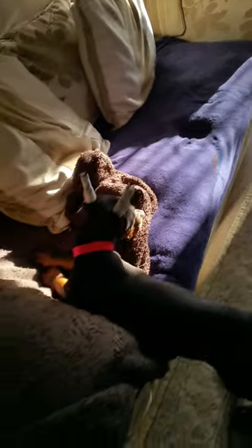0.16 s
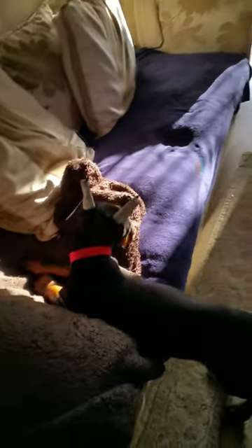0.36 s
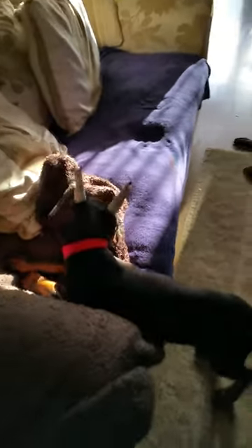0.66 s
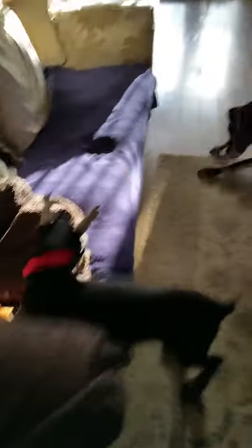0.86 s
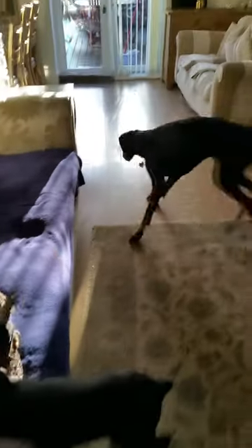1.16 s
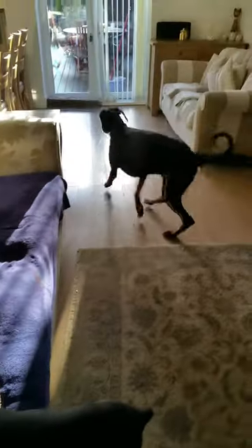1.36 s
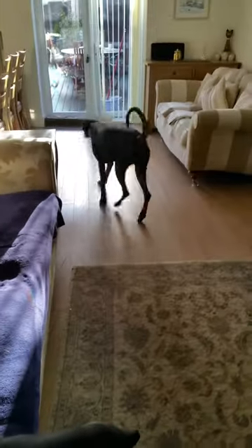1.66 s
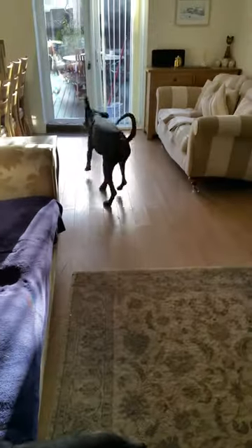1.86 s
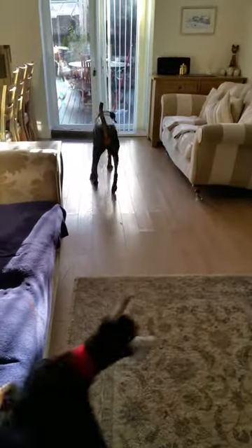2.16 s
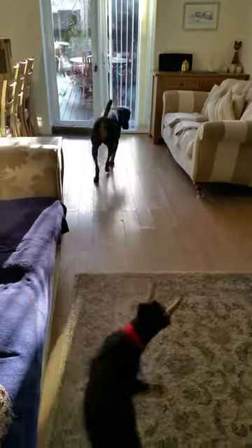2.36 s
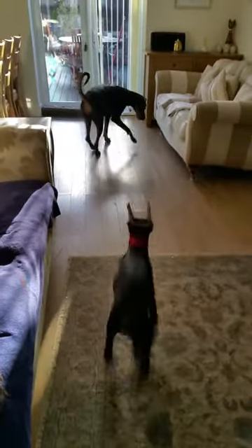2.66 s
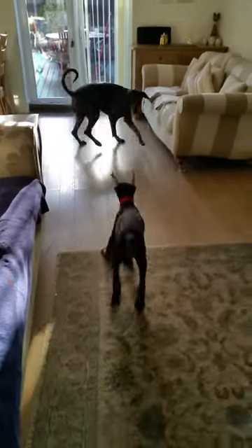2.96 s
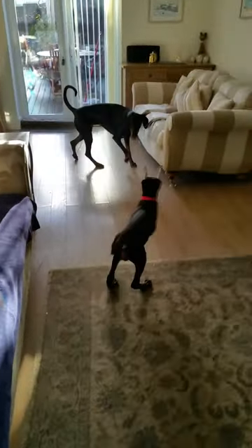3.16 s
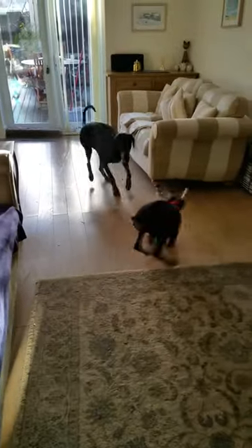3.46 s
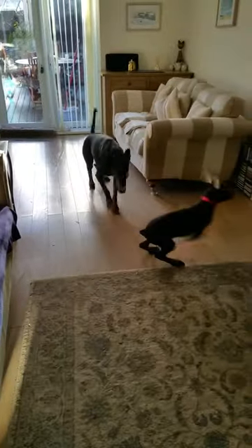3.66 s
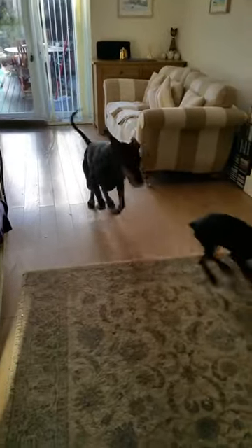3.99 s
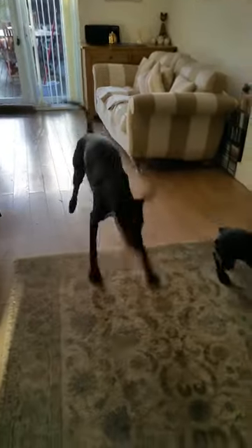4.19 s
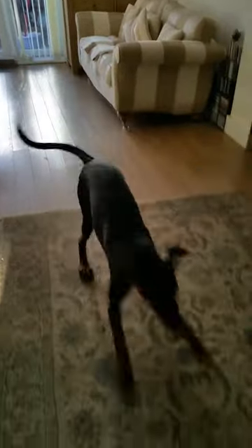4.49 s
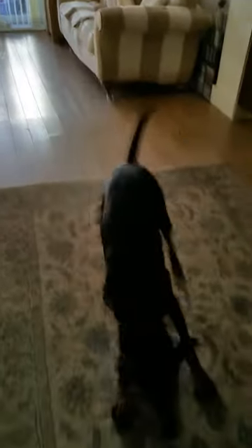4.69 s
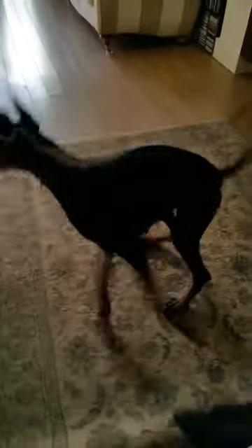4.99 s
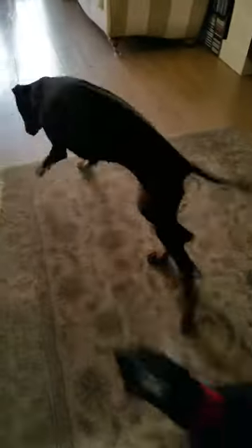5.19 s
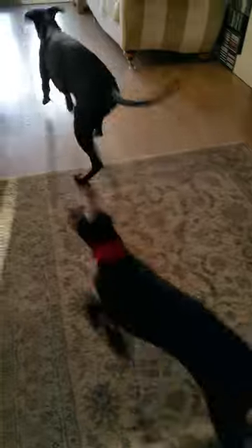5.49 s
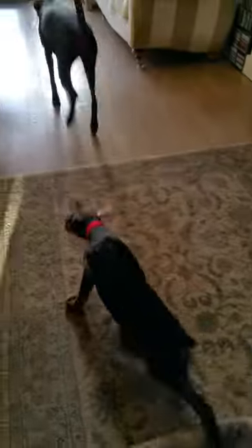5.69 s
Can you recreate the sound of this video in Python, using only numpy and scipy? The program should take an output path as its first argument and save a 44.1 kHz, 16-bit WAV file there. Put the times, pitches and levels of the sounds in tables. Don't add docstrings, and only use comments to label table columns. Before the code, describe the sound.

Two dogs play on laminate and rug near a phone. Low hollow paw thuds, dry nail clicks, scratchy scrapes and rubbing pads come in bursts separated by near-quiet gaps. Metal tags tinkle once clearly, later only faintly. The second half is busier and louder, with one piercing crack. A moderately furnished room adds a short diffuse tail over very faint hum.

```python
import sys
import numpy as np
from scipy import signal
from scipy.fft import rfft, irfft, next_fast_len
from scipy.io import wavfile
from scipy.ndimage import uniform_filter1d, map_coordinates

SR = 44100
rng = np.random.default_rng(int(sys.argv[2]) if len(sys.argv) > 2 else 0)


def to_linear_factor(level_db):
    exponent = np.asarray(level_db, float) / 20
    return 10 ** exponent


def dump(signal):
    limited = np.clip(np.atleast_2d(signal).T, -1, 1)
    pcm = np.round(limited * 32767).astype(np.int16)
    wavfile.write(sys.argv[1], SR, pcm)


N = 257532
TAILS = 5


def unit(x):
    return x / np.sqrt(np.mean(x ** 2) + 1e-20)


def along(points, hz):
    f, v = np.transpose(points)
    return np.interp(np.log(hz + 1), np.log(f + 1), v)


def filtered(x, response):
    m = next_fast_len(x.shape[-1] + 4096)
    return irfft(rfft(x, m) * response(np.fft.rfftfreq(m, 1 / SR)), m)[..., :x.shape[-1]]


def lumps(count, size):
    return unit(uniform_filter1d(rng.standard_normal(count), size, axis=-1))


# hz, likeness (1 = equal, 0 = unrelated)
LIKENESS = [(60, 0.89), (150, 1), (380, 0.75), (950, 0.15), (2380, -1.2), (5980, 0.16), (15000, -1.3)]


def spread(pair, spectrum):
    def turn(hz):
        return np.arccos(np.clip(along(LIKENESS, hz), 0, 1)) / 2

    def response(hz):
        return to_linear_factor(along(spectrum, hz)) * [np.cos(turn(hz)), np.sin(turn(hz))]

    mid, side = filtered(pair, response)
    return np.array([mid + side, mid - side])


def rush(spectrum, grain_db, rate_hz):
    steps = rng.standard_normal(int(N * rate_hz / SR) + 4)
    flicker = map_coordinates(steps, [np.arange(N) * rate_hz / SR], order=1)
    return unit(spread(to_linear_factor(grain_db * flicker) * rng.standard_normal((2, N)), spectrum))


def add(tracks, k, s, sound, room_db, far=None, wide=1):
    at = round(s * SR)
    lag = wide * rng.integers(-7, 8)
    tracks[0, at:at + len(sound)] += sound
    tracks[1, at + lag:at + lag + len(sound)] += sound
    tracks[2 + k % TAILS, at:at + len(sound)] += to_linear_factor(room_db) * (sound if far is None else far)


# hz, level_db (per Hz)
QUIET_SPECTRUM = [(20, 0), (60, 2), (130, -3), (430, -13), (1000, -5), (4370, -22.5), (5570, -8),
                  (6500, -8.5), (16000, -15)]


def background():
    t = np.arange(N) / SR
    tone = to_linear_factor(-64.0) * rush(QUIET_SPECTRUM, 0.6, 2.4)
    hum_level = to_linear_factor(-55.0 + 2.9 * lumps(count=N, size=6000))
    return tone + hum_level * np.sin(2 * np.pi * 98.8 * t)


# hz, t60_s
ROOM_T60 = [(60, 0.7), (160, 0.22), (420, 0.44), (1100, 0.37), (3000, 0.41), (8000, 0.29), (16000, 0.21)]
# hz, level_db
ECHO_SPECTRUM = [(150, -2.5), (400, -1), (1200, -0.5), (6000, -0.5)]


def room(tracks):
    noise = rng.standard_normal((TAILS, 2, SR * 5 // 8))
    hz, t, z = signal.stft(noise, SR, nperseg=256)
    tails = signal.istft(z * to_linear_factor(-60 * t / along(ROOM_T60, hz)[:, None]), SR, nperseg=256)[1]
    tails = np.array([spread(pair, ECHO_SPECTRUM) for pair in tails])
    t = np.arange(tails.shape[-1]) / SR
    tails *= 1 - np.exp(-t / 0.0026)
    grain_db = 3 * np.exp(-t / 0.082)
    tails *= to_linear_factor(grain_db * lumps(count=tails[:, :1].shape, size=50))
    tails /= np.sqrt(np.mean(np.sum(tails ** 2, -1)))
    m = tracks.shape[1]
    echoes = irfft((rfft(tracks[2:, None], m) * rfft(tails, m)).sum(0), m)
    return (tracks[:2] + echoes)[:, :N]


# time_s, level_db
SCUFFLE_EFFORT = [(0, -67.5), (.3, -32), (.6, -65), (.95, -54), (1.4, -52), (1.85, -59.5), (2.7, -59.5),
                  (2.8, -49.5), (3.28, -52.5), (3.45, -39.5), (4.15, -47), (4.43, -38.5), (4.58, -66),
                  (4.81, -35.5), (5.25, -41.5), (5.56, -42.5), (5.68, -39), (5.84, -39)]
# peak_s, level_db, rise_s, fall_s (each time to change by 20 dB)
SKID_EVENTS = [(0.099, -53.5, 0.089, 0.6), (0.204, -25.5, 0.04, 0.0851), (1.001, -45, 0.14, 0.24),
               (1.22, -62.5, 0.11, 0.5), (1.85, -44.5, 0.52, 0.35), (2.78, -52, 0.046, 0.25),
               (3.45, -46, 0.15, .5), (3.75, -33.5, 0.17, 0.36), (3.92, -43.5, 0.3, 0.08),
               (4.235, -42, 0.057, 0.04), (4.43, -52, 0.12, 2), (5.253, -30, 0.22, 0.18),
               (5.84, -47, 0.091, -4)]
# hz, level_db (per Hz)
RUMBLE_SPECTRUM = [(20, -20), (30, 0.5), (60, 7), (95, -6), (140, -59)]
# hz, level_db (per Hz)
BODY_SPECTRUM = [(90, -18), (150, -5.5), (240, -2.5), (450, -4), (800, -11), (1300, -38)]
# hz, level_db (per Hz)
HISS_SPECTRUM = [(500, -40), (900, 5), (2000, -1), (3500, -5), (5300, -8.5), (6500, -7), (8000, -21)]
# hz, level_db (per Hz)
TOP_SPECTRUM = [(5500, -48), (7000, 3), (8000, 4), (11000, 2.5), (15500, -8)]


def drag():
    t = np.arange(N) / SR
    effort_db = np.interp(t, *np.transpose(SCUFFLE_EFFORT))
    mean_db = effort_db.mean()
    skid = sum(to_linear_factor(db - 20 * np.maximum((s - t) / rise, (t - s) / fall))
               for s, db, rise, fall in SKID_EVENTS)
    shake = to_linear_factor(mean_db - 3.5 + 0.71 * (effort_db - mean_db))
    rumble = shake * rush(RUMBLE_SPECTRUM, 5, 12)
    body = (to_linear_factor(effort_db - 6.0) + to_linear_factor(-4.5) * skid) * rush(BODY_SPECTRUM, 3.7, 40)
    hiss = (to_linear_factor(effort_db - 16.0) + to_linear_factor(-4) * skid) * rush(HISS_SPECTRUM, 0.93, 200)
    top = (to_linear_factor(effort_db - 31.0) + to_linear_factor(-13.5) * skid) * rush(TOP_SPECTRUM, 1.4, 100)
    return rumble + body + hiss + top


# start_s, length_s, pitch_hz, level_db, glide (relative rise in pitch)
WHINE_CALLS = [
    (.04, 0.09, 211.2, -54.5, 0.021),
    (3.318, .05, 990, -48, 0.145),
]
# hz, level_db
THROAT_RESPONSE = [(200, -17), (500, 4), (1050, -2), (1350, 2.5), (1650, -15.5), (1950, -6), (3300, -19.5),
                   (4500, -50)]


def whines(tracks):
    for k, (s, length, hz, db, glide) in enumerate(WHINE_CALLS):
        u = np.arange(round(length * SR)) / (length * SR)
        waver = unit(uniform_filter1d(rng.standard_normal(len(u)), 300))
        phase = 2 * np.pi * np.cumsum(hz * (1 + glide * u + 0.026 * waver)) / SR
        voice = np.zeros(len(u))
        for n in range(1, 12):
            if n * hz < 5000:
                hoarse_db = 4 * lumps(count=len(u), size=500)
                voice += to_linear_factor(along(THROAT_RESPONSE, n * hz) + hoarse_db) * np.sin(n * phase)
        add(tracks, k, s, to_linear_factor(db) * np.sin(np.pi * u) * voice, -3)


# start_s, ring_db, small_disc_db, large_disc_db (peak levels)
TAG_STRIKES = [(1.523, -54, -80, -54.5), (1.618, -52, -42, -67), (1.775, -58, -72, -72),
               (1.866, -34, -29, -21), (1.875, -31.5, -32, -70), (1.889, -33, -26, -70),
               (1.91, -37, -31, -70), (2.045, -54.5, -56, -70), (2.055, -65.5, -70, -42.5),
               (2.195, -68, -64, -77), (3.519, -55, -68, -75), (3.572, -74, -49, -75),
               (3.642, -47, -60, -72), (4.03, -53, -75, -72), (4.157, -65, -76, -73),
               (4.244, -40.5, -57, -85), (4.27, -65, -69, -70), (4.354, -56, -49, -75),
               (4.437, -47, -44, -75), (4.829, -56, -70, -68), (4.865, -51, -49, -70), (4.9, -67, -71, -77),
               (4.931, -59, -59, -75), (5.294, -48.5, -68, -75), (5.37, -56, -62.5, -75),
               (5.482, -54, -62, -58), (5.513, -48, -35.5, -52), (5.564, -47, -50, -56)]
# hz, level_db, t60_s
TAG_MODES = [
    [(10900, 0, 0.17), (10300, -3, 0.055), (10830, 6.5, 0.21), (9780, -4.5, 0.14), (12600, -12, 0.06)],
    [(13960, 3.5, 0.12), (13890, -8, .1), (15300, -20, .05)],
    [(4700, -1, 0.3), (4745, -1.5, 0.36), (3295, -19, 0.29), (2940, -21, 0.18)],
    [(8930, -3, 0.16), (7330, -9.5, 0.16)],
]


def chatter_depth(hz):
    if 9500 < hz < 13000:
        return 1.3
    if hz > 6000:
        return 0.5
    return 0.08 if hz > 4000 else 0.2


def tags(tracks):
    t = np.arange(SR // 3) / SR
    for k, (s, *drive_db) in enumerate(TAG_STRIKES):
        drive_db.append(-19 + 0.34 * drive_db[0] + 0.25 * drive_db[1])
        chatter = unit(signal.fftconvolve(rng.standard_normal(len(t)), np.hanning(240), "same"))
        parts = []
        for db, modes in zip(drive_db, TAG_MODES):
            part = np.zeros(len(t))
            for hz, level_db, t60 in modes:
                swell_s = 0.015 if hz < 6000 else 0.00059
                envelope = to_linear_factor(db + level_db - 60 * t / t60) * (1 - np.exp(-t / swell_s))
                mode_hz = hz * rng.normal(1, 0.00025)
                part += envelope * np.sin(2 * np.pi * mode_hz * t + chatter_depth(hz) * chatter)
            parts.append(part)
        loose, small, large, clasp = parts
        tracks[:3, round(s * SR):][:, :len(t)] += to_linear_factor([[0], [-2], [-12]]) * large
        crackle = unit(np.diff(rng.standard_normal(len(t) + 3), n=3))
        clink = to_linear_factor(max(drive_db[:2]) + 1) * np.exp(-t / 0.003) * crackle
        still_moving = 0 < s - TAG_STRIKES[k - 1][0] < 0.02
        add(tracks, k, s, loose + small + clasp + (0.2 if still_moving else 1) * clink, -3.5)


def swing_pulse(t, hz, cycles):
    u = t * hz / cycles
    return u * np.exp(1 - u) * np.sin(2 * np.pi * hz * t)


# start_s, peak_db, pitch_hz,
# right_lag_samples
TAP_EVENTS = [(.1562, -16, 800, -1), (.1762, -14.5, 614, -3.5), (.27, -24, 550, 13), (.31, -32, 517, -8),
              (.36, -35, 587, 6), (.944, -24, 4500, -2), (1.02, -42, 540, -9), (1.09, -45, 580, 7),
              (1.195, -30, 553, -10), (1.336, -40, 885, 2), (1.36, -35, 124, 2), (1.418, -37, 3200, -2),
              (1.7875, -20.5, 5200, 1.5), (2.09, -42, 42, 0), (2.29, -42, 45, 0), (2.949, -38, 2800, 5),
              (3.0955, -38.5, 4620, 2), (3.17, -41, 45, 0), (3.383, -27, 550, 16), (3.404, -28, 3100, -5),
              (3.418, -32, 1410, 6), (3.452, -25, 5000, 6), (3.463, -22, 5500, -5), (3.47, -34, 3000, 4),
              (3.505, -28, 4300, 0), (3.546, -36, 6000, 5), (3.55, -38, 1300, -10), (4.191, -29, 3600, 3),
              (4.27, -22, 550, -9), (4.335, -26, 534, 10), (4.3985, -35, 2620, -5), (4.399, -33, 850, 6),
              (4.411, -46, 10200, 2), (4.43, -37, 1900, -7), (4.4652, -33.5, 2010, 4),
              (4.478, -39, 2700, -6), (4.628, -31, 2480, 5), (4.645, -30, 1100, -8), (4.66, -35, 1900, 6),
              (4.685, -33, 1040, -8), (4.71, -37, 1310, 7), (4.8, -36, 2200, -8), (4.84, -35, 2400, 6),
              (5.0155, -30, 1300, -8), (5.015, -32, 8500, -6),
              (1.165, -25, 540, 8), (1.225, -33, 500, -7), (1.52, -38, 520, 6), (1.73, -38, 430, -8),
                (1.86, -40, 850, 5), (3.69, -26, 420, -7), (3.885, -22, 250, 6), (4.415, -31, 1150, -5),
                (5.19, -33, 330, 8), (5.82, -34, 600, -6)]


def taps(tracks):
    t = np.arange(SR // 6) / SR
    for k, (s, db, hz, lag) in enumerate(TAP_EVENTS):
        note = to_linear_factor(db) * swing_pulse(t, hz, 0.71)
        left, right = round(s * SR), round(s * SR + lag)
        tracks[0, left:left + len(t)] += note
        tracks[1, right:right + len(t)] += note
        tracks[2 + k % TAILS, left:left + len(t)] += to_linear_factor(-2) * note


# start_s, peak_db, pitch_hz
NAIL_RAPS = [(.156, -24, 1380), (.9445, -32, 3000), (1.485, -40, 1500), (2.949, -35, 1470),
             (3.6138, -27, 4500), (3.6207, -22, 4260), (3.6746, -5, 4860), (3.811, -20, 1860),
             (3.828, -20, 2000), (3.851, -19, 2200), (3.9704, -25, 4500), (3.987, -23, 5060),
             (4.005, -14.5, 5250), (4.281, -35, 2180), (4.349, -39, 905), (4.398, -35, 3300),
             (4.41, -34, 1800), (4.417, -29, 1500), (4.4655, -36, 1280), (4.618, -21, 1055),
             (4.631, -38, 2450), (4.733, -36, 890), (4.777, -27.5, 875), (4.78, -37, 2200),
             (5.026, -43, 4500), (5.465, -33, 1890), (5.584, -30, 2080), (5.61, -29.5, 5540),
             (5.628, -36, 4200), (5.735, -20, 8360), (5.752, -23, 3300), (5.765, -31, 3830),
             (5.82, -38, 4500)]


def raps(tracks):
    t = np.arange(SR // 40) / SR
    for k, (s, db, hz) in enumerate(NAIL_RAPS):
        envelope = (1 - np.exp(-t * hz * 4)) * np.exp(-t * hz / 2.53)
        add(tracks, k, s, to_linear_factor(db) * envelope * np.sin(2 * np.pi * hz * t), 0.5)


def knock(tracks):
    t = np.arange(-40, 40) / SR
    crack = to_linear_factor(-2.5) * np.exp(-(t / 0.00028) ** 2) * np.sin(2 * np.pi * 4700 * t)
    at = round(3.8052 * SR)
    tracks[:3, at:at + len(t)] += crack


# start_s, peak_db, pitch_hz
WEIGHT_LANDINGS = [(.17, -30, 59), (1.17, -31, 139), (1.345, -39, 60), (4.254, -15.5, 513),
                   (2.8, -35.5, 155), (2.96, -29.5, 106), (3.2, -41, 110), (3.4, -27, 70.3),
                   (3.88, -34, 70.4), (4.28, -24, 67), (4.47, -32, 55), (4.635, -21, 122.4),
                   (4.65, -27, 45), (4.84, -46, 46), (5.02, -39.5, 50.3), (5.3, -33, 60.3),
                   (5.66, -26, 50.3), (.1555, -6, 496), (.1635, -9.5, 546), (.175, -15.5, 157),
                   (.2, -18, 189), (.222, -18, 151.4), (.195, -13, 240), (1.35, -25.5, 191),
                   (2.225, -30, 157), (3.415, -12.5, 377), (4.624, -13.5, 220), (5.657, -11.5, 404),
                   (5.6655, -9.5, 432)]


def weight(tracks):
    t = np.arange(SR // 6) / SR
    for k, (s, db, hz) in enumerate(WEIGHT_LANDINGS):
        add(tracks, k, s, to_linear_factor(db) * swing_pulse(t, hz, 0.81), -6, wide=2)


# start_s, peak_db, top_db, scrape_ms
TIP_CLICKS = [(0.9435, -25.5, -45, 27), (1.1517, -15, -15, 9.4), (1.418, -32, -24, 3.6),
              (1.4679, -30.5, -10, 5.1), (1.618, -37, -11, 8.1), (1.7852, -21.5, -18, 4.5),
              (1.7864, -24, 0, 6.3), (2.0321, -29.5, -27, 7.4), (2.089, -33, -31, 5),
              (2.322, -26, -16, 2.2), (3.094, -29.5, -14, 5.6), (3.433, -22, -18, 34),
              (3.5435, -31.5, -18, 6.2), (3.606, -21.5, -16, 26), (3.6258, -18, -9, 8.6),
              (3.666, -8, -13.5, 22.6), (3.8092, -30, -12, 2), (3.961, -22.5, -14, 39),
              (4.002, -21, -11, 4), (4.189, -28, -27, 7), (5.739, -26, -17, 9.3), (5.819, -27, -2, 8)]
# start_s, peak_db, top_db, scrape_ms
FLAT_CLICKS = [(0.1553, -16, -10.5, 6.8), (0.934, -30, -35, 8.8), (1.3366, -33, -6.5, 5.2),
               (1.6936, -31.5, -6.5, 6.1), (2.208, -41, -32, 6.2), (2.2537, -43, -9, 9.3),
               (2.4956, -43.5, -10, 32), (2.563, -32, -16, 18.3), (2.7994, -43, -5, 7.2),
               (2.845, -38.5, -12, 8), (2.949, -36, -41, 14), (3.178, -39, -24, 11),
               (3.3755, -24, -16, 7.2), (3.8053, -5, -16.5, 6.8), (4.2507, -31.5, -18, 5.4),
               (4.398, -32, -30, 4), (4.4658, -34, -25, 4), (4.6155, -25.5, -36, 5), (4.778, -46, -17, 8.8),
               (5.015, -27, -9, 5.1), (5.464, -36, -16, 2.7), (5.5836, -29.5, -9, 3.3),
               (5.6254, -34, -7.5, 16), (5.653, -28.5, -34, 5.2), (5.735, -33, 2.5, 14)]


def claws(tracks):
    t = np.arange(SR // 8) / SR
    contacts = [(*row, 4500, 1) for row in TIP_CLICKS] + [(*row, 1990, -5.5) for row in FLAT_CLICKS]
    for k, (s, db, top_db, ms, hz, tick_db) in enumerate(sorted(contacts)):
        rise_ms = 0.02 * ms * ms + 0.26
        envelope = (1 - np.exp(-t * 1000 / rise_ms)) * np.exp(-t * 1000 / np.clip(ms, 0.5, 40))
        scrape = envelope * rng.standard_normal(len(t))
        scrape = scrape * to_linear_factor(3.5 * lumps(count=len(t), size=60))
        pair = np.array([scrape, np.linalg.norm(scrape) * (t == 0)])

        def nail(f):
            resonance = 1j * f * 3000 / (hz * hz - f * f + 1j * f * 3000)
            broad = 0.59 * 1j * f / (800 + 1j * f) / (1 + 1j * f / 6000) ** 2
            return (resonance + broad) / (1 + (1j * f / 7000) ** 2 + 1.3j * f / 7000)

        rasp = filtered(pair, nail)
        edge = filtered(pair, lambda f: (1j * f / (7000 + 1j * f)) ** 3)
        rasp = 0.71 * rasp / np.abs(rasp[0]).max()
        edge = to_linear_factor(top_db + 11.0) * 0.64 * edge / np.abs(edge[0]).max()
        near, far = rasp + edge
        u = t * hz / 0.37
        bright = to_linear_factor(top_db + 5.0) * np.cos(2 * np.pi * 13000 * t)
        tick = u * np.exp(1 - u) * (np.sin(2 * np.pi * hz * t) + bright)
        tick = to_linear_factor(min(tick_db, 5) + 5 - 0.14 * ms) * tick
        add(tracks, k, s + 0.0008, to_linear_factor(db - 2.5) * (near + tick), 1.5, to_linear_factor(db + 0.5) * far)


# start_s, peak_db, pitch_hz, slap_db
BOARD_FALLS = [(.155, -11.5, 303, -20), (.412, -39, 258, -9), (0.942, -41, 377, -9),
               (1.152, -15.5, 288, -25), (1.47, -26, 230, -11.5), (1.633, -34, 570, -4.5),
               (2.021, -33.5, 256, -31), (2.208, -24.5, 294, -17), (2.481, -24, 222, -17.5),
               (2.803, -27.5, 325, -25), (3.098, -31, 335, -9), (3.181, -28, 264, -10.5),
               (3.377, -14.5, 265, -11), (3.404, -8.5, 254, -20), (3.805, -16, 240, -11),
               (4.253, -7.5, 224, -21.5), (4.408, -18.5, 228, -14.5), (4.517, -25, 173.6, -31),
               (5.205, -29, 188, -15), (5.581, -17, 237, -12), (5.631, -17.5, 257, -12.5),
               (5.647, -10.5, 252, -19.5)]
# start_s, peak_db, pitch_hz, slap_db
RUG_FALLS = [(0.215, -14, 300, -18), (.489, -38, 263, -7), (.807, -48, 400, -1), (1.337, -25, 238, -13),
             (1.702, -36, 198, 2.5), (2.546, -25, 189, -16), (2.876, -28, 215, -23),
             (2.948, -26, 213, -6.5), (3.67, -12, 278, -25), (3.861, -12, 215, -11.5),
             (3.959, -14.5, 200, -21), (4.084, -23.5, 259, -18), (4.467, -8.5, 217, -20.5),
             (4.616, -7, 397, -15.5), (4.74, -18, 203, -29), (4.777, -12.5, 212, -19),
             (4.953, -21.5, 239, -10.5), (5.013, -18, 245, -13.5), (5.28, -6, 223, -23.5),
             (5.321, -15.5, 191, -14), (5.472, -28.5, 222, -8)]
# start_s, peak_db, pitch_hz
ROLLING_FALLS = [(.174, -5, 335), (0.185, -12, 557), (0.205, -12, 219), (1.172, -20, 298),
                 (1.21, -23.5, 331), (1.248, -35, 330), (1.28, -36, 350), (1.498, -27.5, 212),
                 (2.639, -54, 215), (3.46, -15.5, 300), (3.519, -31, 313), (3.622, -21.5, 332),
                 (3.98, -19.5, 200), (3.999, -15, 224), (4.05, -34.5, 225), (4.284, -1, 252),
                 (4.298, -10.5, 332), (4.312, -7.5, 282), (4.329, -19, 310), (4.424, -19.5, 245),
                 (5.04, -28, 198), (5.305, -26, 260), (5.338, -29, 194), (5.517, -38, 336),
                 (5.606, -18, 183), (5.683, -19, 330), (5.702, -18.5, 300), (5.716, -26, 354),
                 (5.738, -17.5, 184), (5.792, -24, 210)]
# hz, level_db (per Hz)
SLAP_SPECTRUM = [(250, -19), (500, -1), (900, -5), (1500, -17), (3000, -23), (6000, -33.5)]


def paws(tracks):
    t = np.arange(SR // 12) / SR
    falls = [(*row, 3.5) for row in BOARD_FALLS]
    falls += [(*row, -2) for row in RUG_FALLS]
    falls += [(*row, -31, -2.5) for row in ROLLING_FALLS]
    for k, (s, db, hz, slap_db, room_db) in enumerate(sorted(falls)):
        u = t * hz / 0.73
        swing = swing_pulse(t, hz, 0.73)
        overtone = 0.23 * u * np.exp(1 - 0.97 * u) * np.sin(2 * np.pi * 1.586 * hz * t)
        noise = unit(filtered(rng.standard_normal(len(t)), lambda f: to_linear_factor(along(SLAP_SPECTRUM, f))))
        slap = to_linear_factor(slap_db + 1.5 - 60 * t / 0.073) * (1 - np.exp(-t / 0.0052)) * noise
        add(tracks, k, s + 0.001044, to_linear_factor(db - 2.0) * (swing + overtone + slap), room_db, wide=2)


def scene():
    tracks = np.zeros((TAILS + 2, next_fast_len(N + SR)))
    for source in (paws, weight, claws, raps, taps, knock, tags, whines):
        source(tracks)
    return room(tracks) + drag() + background()


# hz, level_db
MIC_RESPONSE = [(20, -6), (60, -8.5), (130, 1.5), (4200, 1.5), (5200, 2), (6200, -4.5), (15600, -4.5),
                (16000, -23), (16600, -55.5)]
# hz, left_minus_right_db
PORT_DIFFERENCE = [(60, 2), (300, 0), (1200, 1.5), (4000, 1), (8000, -0.5), (13000, -7.5)]


def microphones(dry):
    half = np.array([[0.5], [-0.5]])
    x = filtered(dry, lambda hz: to_linear_factor(along(MIC_RESPONSE, hz) + half * along(PORT_DIFFERENCE, hz)))
    return x / (1 + np.abs(x) ** 8) ** (1 / 8)


def top_cut(x):
    return signal.sosfilt(signal.butter(12, 16510, fs=SR, output="sos"), x)


def record(dry):
    return top_cut(microphones(dry))


dry = scene()
out = record(dry)
dump(out)
```